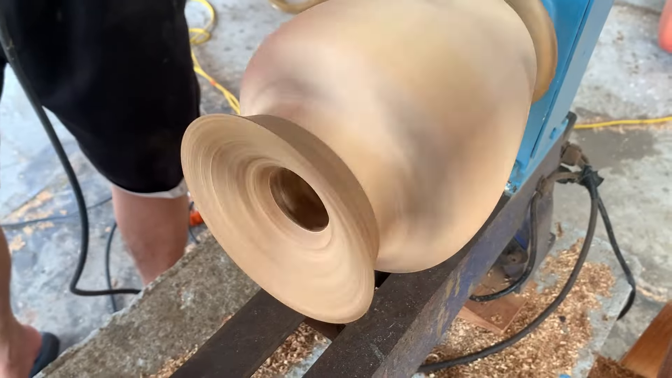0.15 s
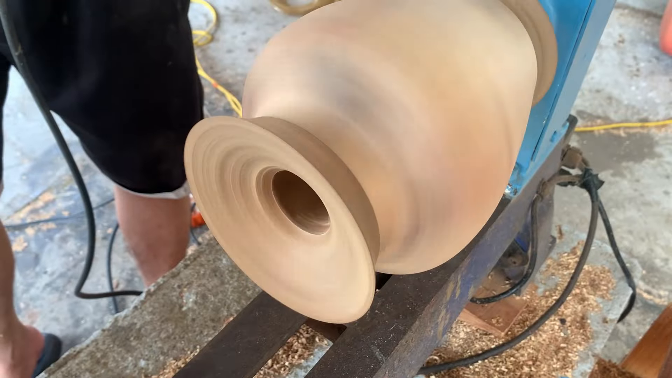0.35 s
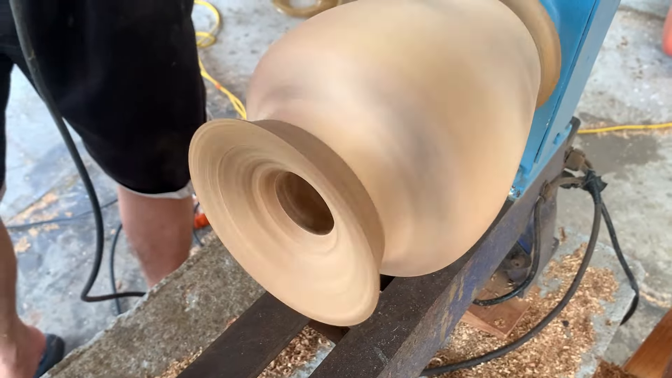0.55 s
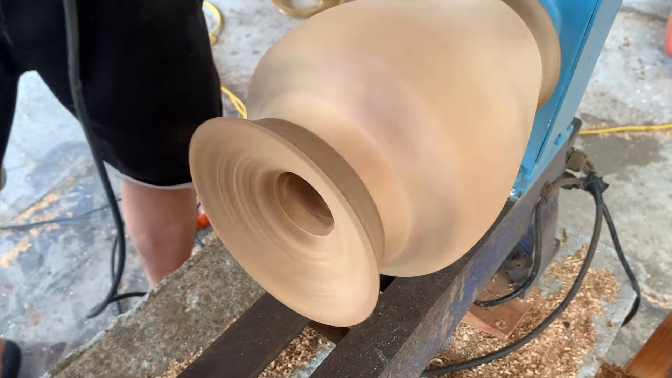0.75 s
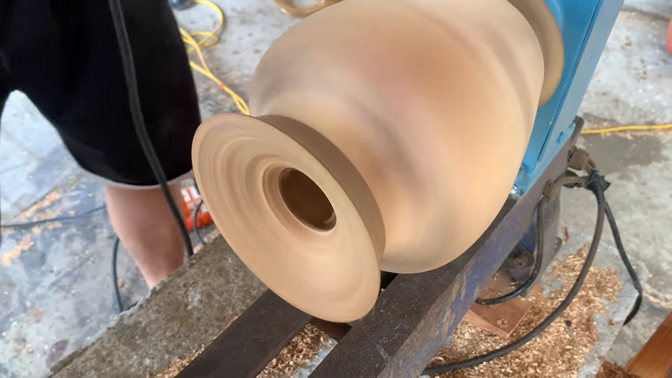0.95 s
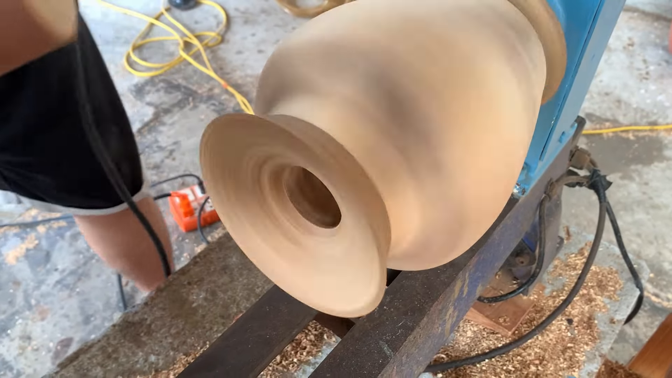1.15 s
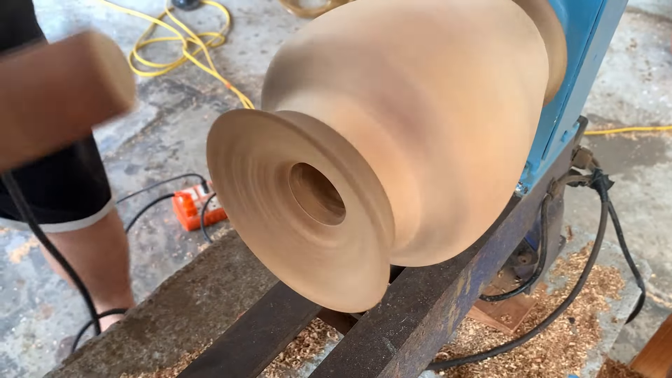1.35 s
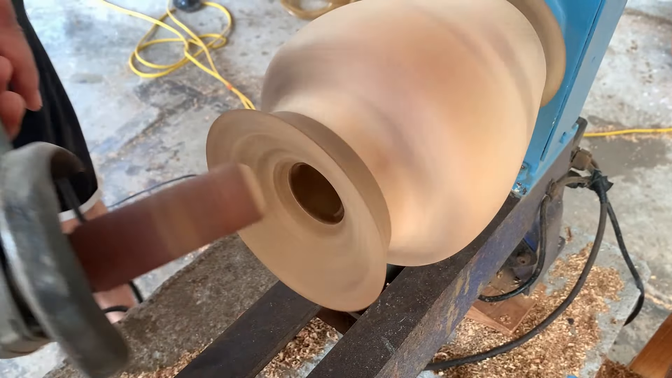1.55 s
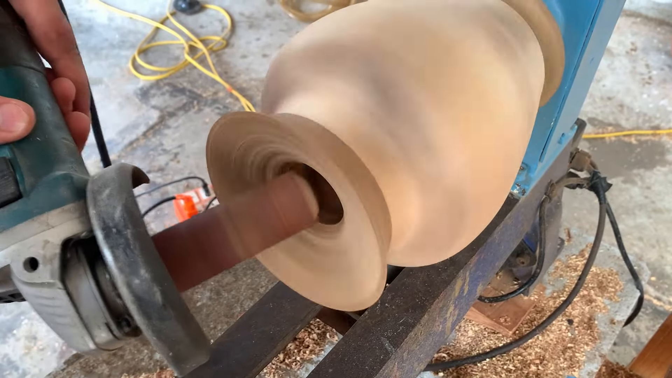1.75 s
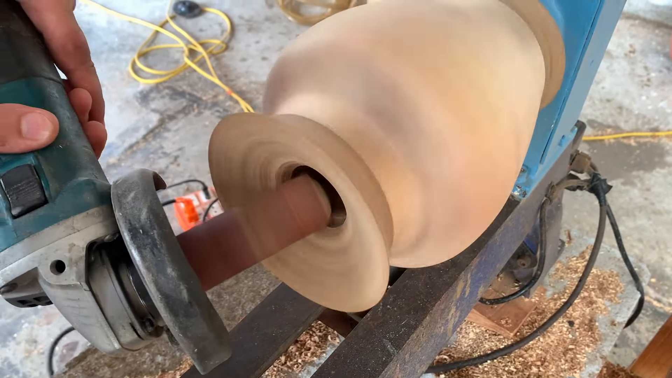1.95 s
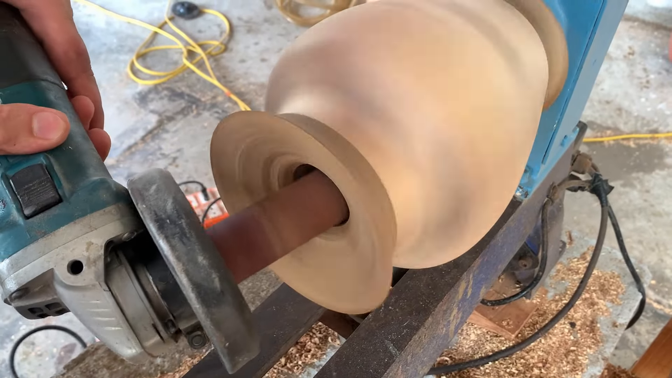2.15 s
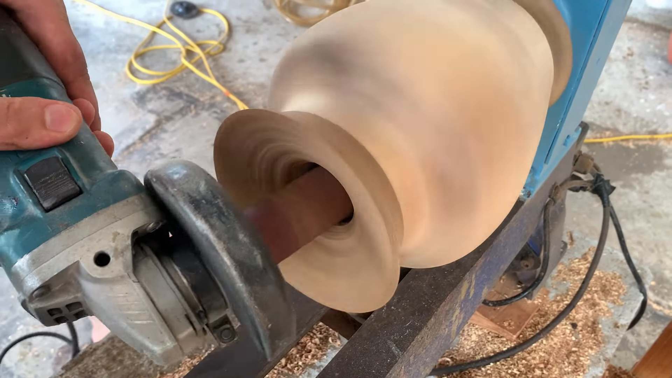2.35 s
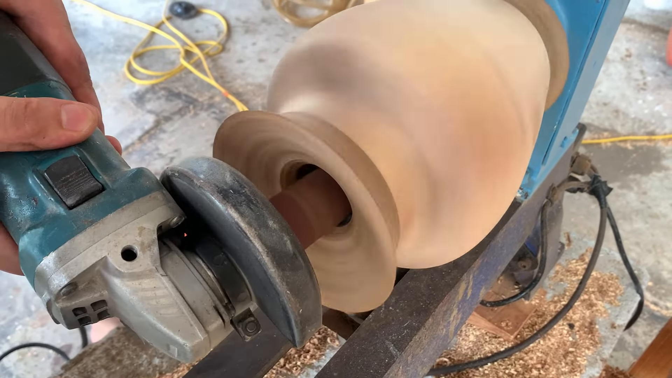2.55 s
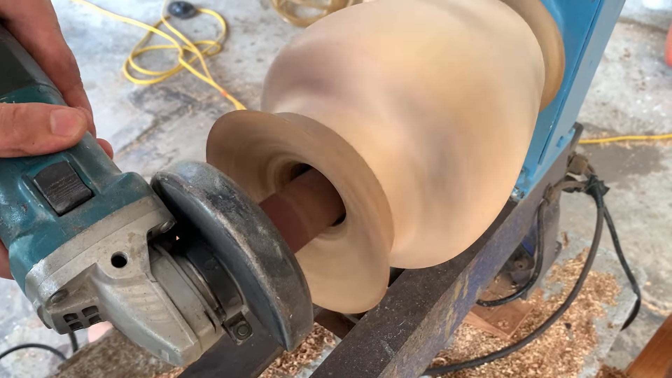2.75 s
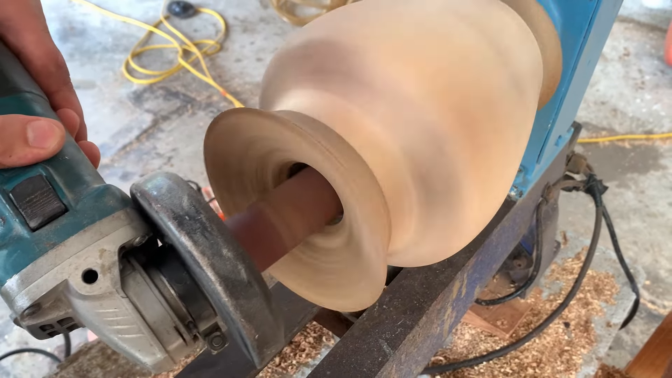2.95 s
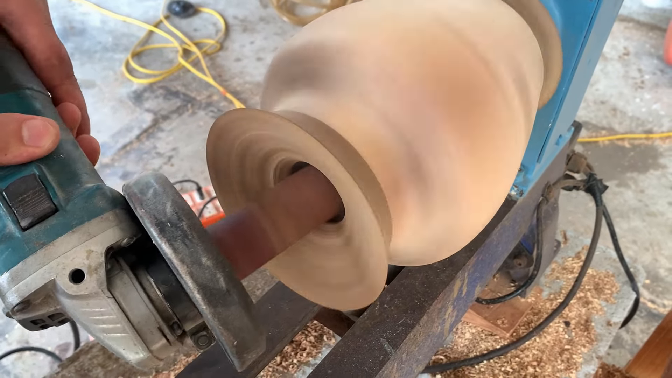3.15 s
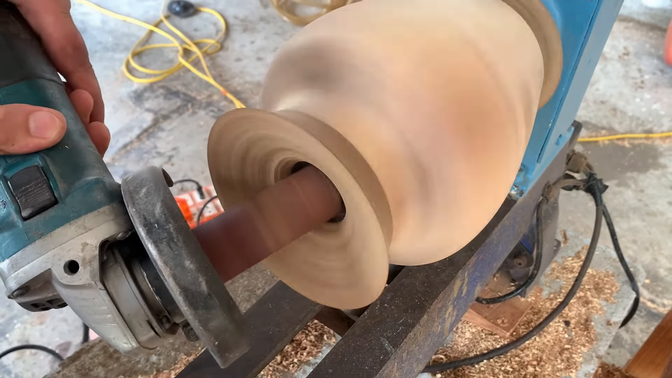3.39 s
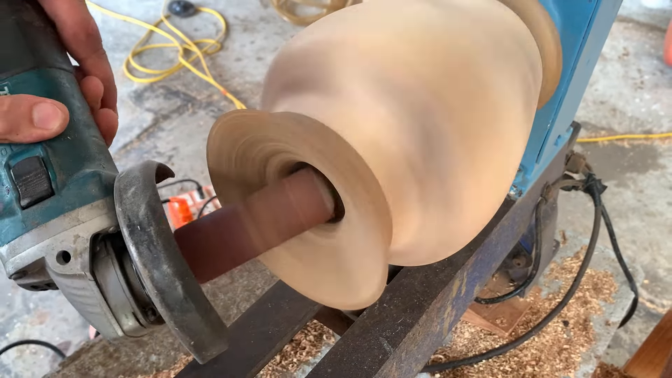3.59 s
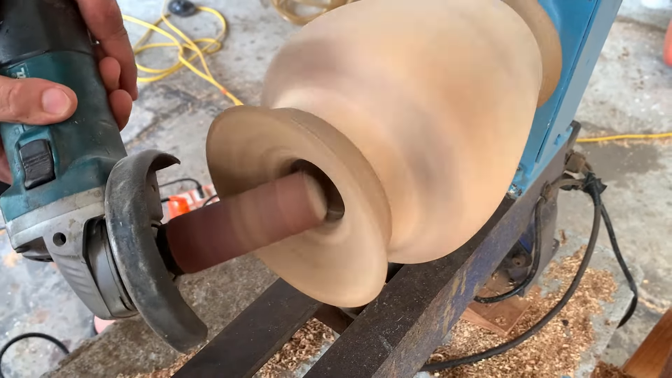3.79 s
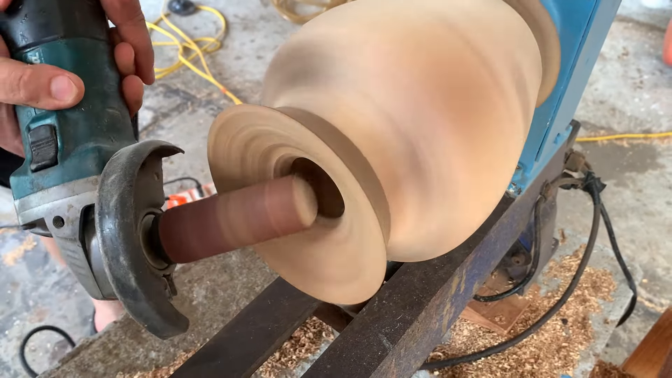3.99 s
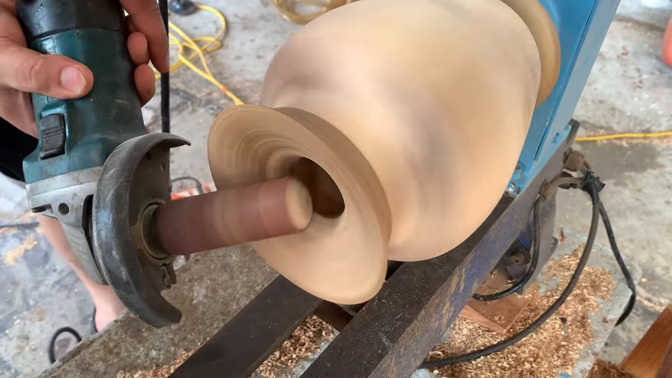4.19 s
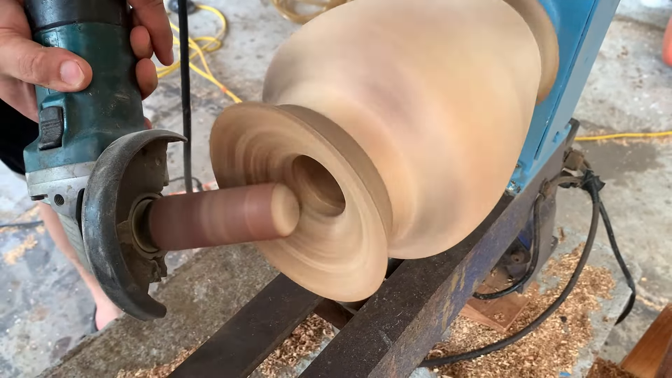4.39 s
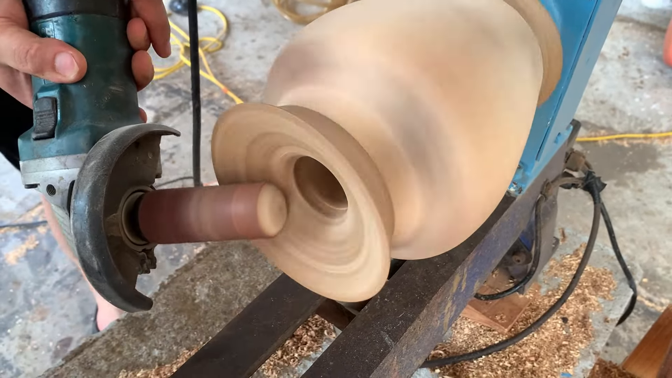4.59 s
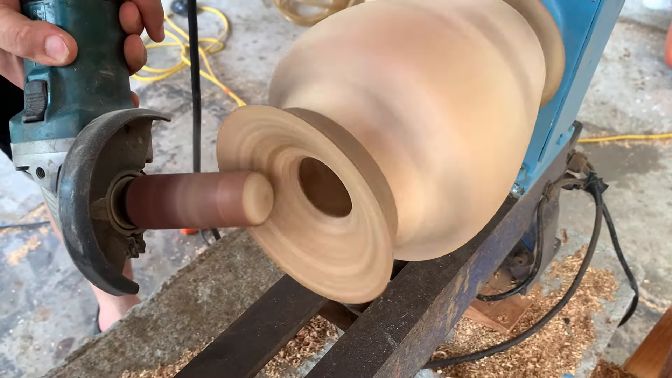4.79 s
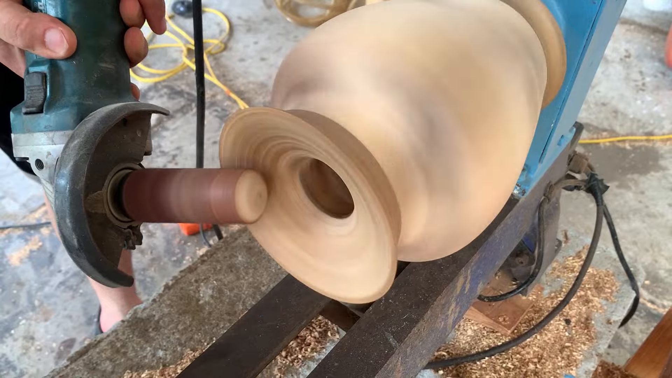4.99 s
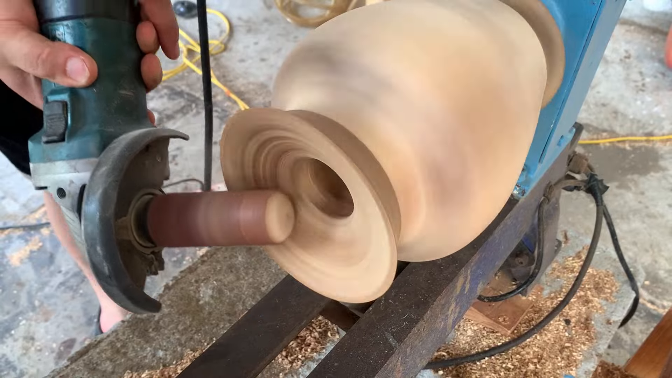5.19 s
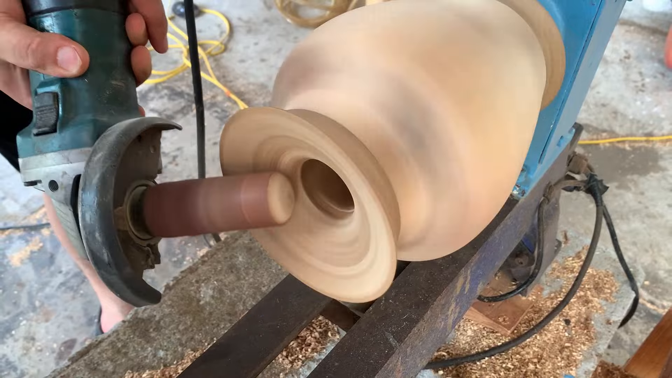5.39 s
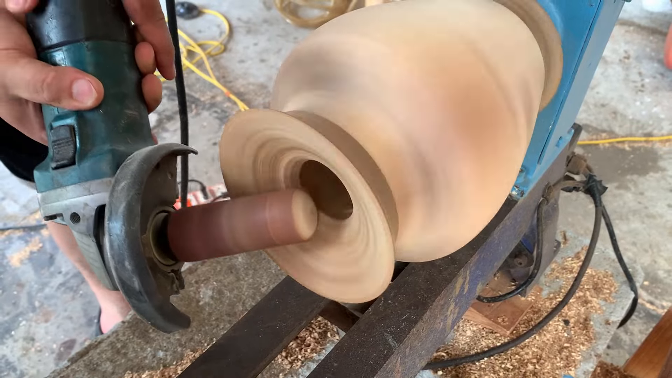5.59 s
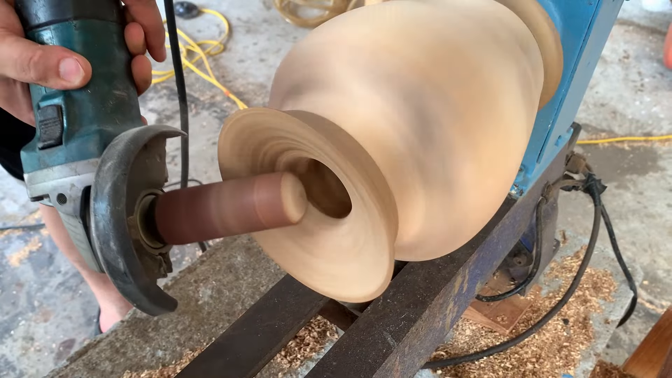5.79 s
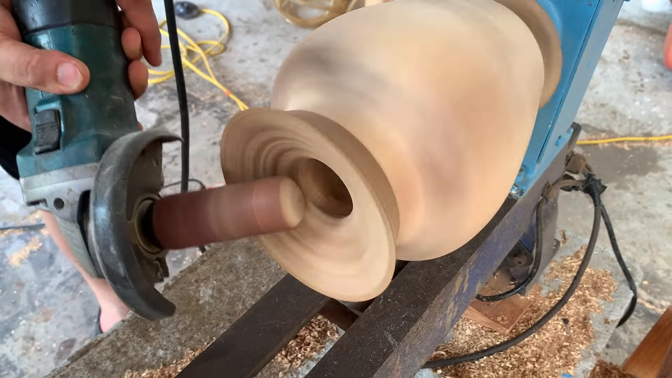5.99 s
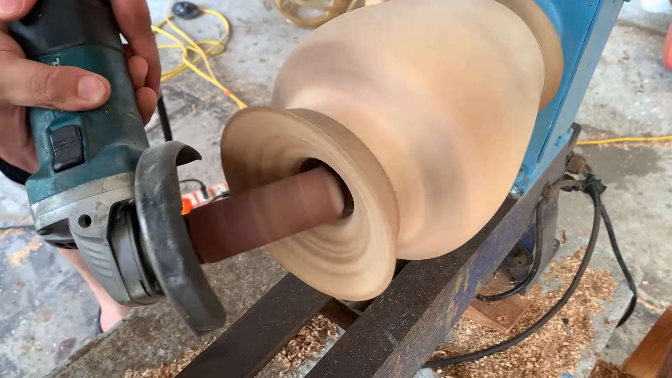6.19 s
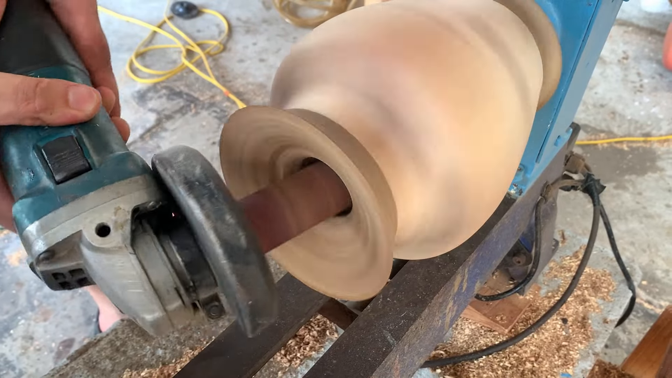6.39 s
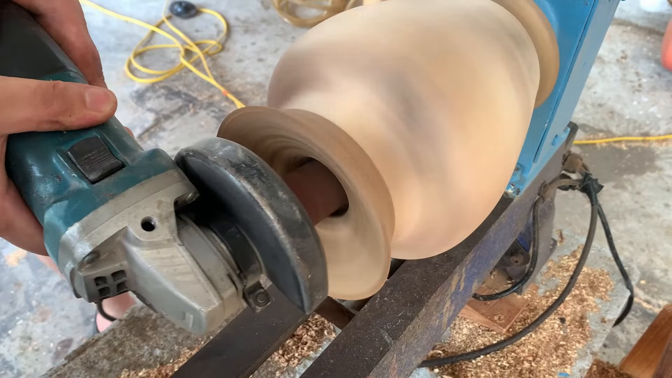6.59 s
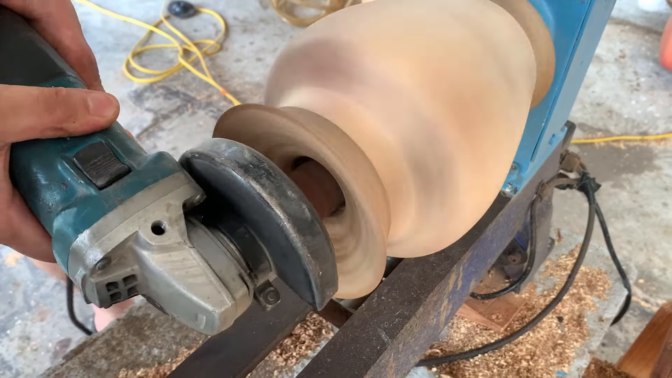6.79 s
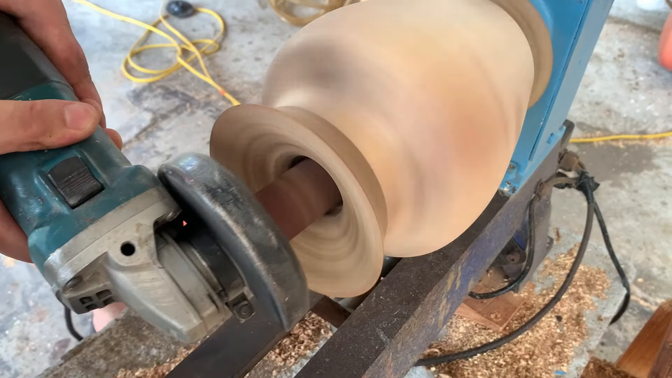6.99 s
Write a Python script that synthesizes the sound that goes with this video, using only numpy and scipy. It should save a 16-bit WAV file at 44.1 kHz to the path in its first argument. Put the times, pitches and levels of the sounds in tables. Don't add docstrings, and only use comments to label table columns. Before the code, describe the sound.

Close, dry stereo in a workshop, with a rapid choppy flutter that differs left and right. From 0 to 1.2 s a lathe spins a wooden vase: broad belt whirr, airy hiss, a hollow hum around 400 Hz swelling in by 0.3 s and swaying in pitch, and irregular bright ticks of a loose guard, densest before 0.6 s. Low puffs and thuds bump the microphones, strongly near 1.05 s. At 1.22 s a grinder's sanding drum bites with a snagging, ringing burst, then tears steadily: sharp hiss above 8 kHz, gritty rasp and dull wood body beneath, motor whine swelling near 1.6 s and fading by 2.3 s. The rasp is strong and fairly smooth from 2 to 2.8 s, then dips repeatedly, leaving thin hiss. From 4.2 to 4.9 s and 5.2 to 5.9 s, crackling rim slaps chatter. Muffled dips follow, and smoother sanding continues to 7 s, with a knock at 6.9 s.

```python
import sys
import numpy as np
from scipy import signal
from scipy.fft import rfft, irfft, next_fast_len
from scipy.io import wavfile
from scipy.ndimage import uniform_filter1d, minimum_filter1d

SR = 44100
rng = np.random.default_rng(int(sys.argv[2]) if len(sys.argv) > 2 else 0)


def output_pcm(signal):
    pcm = np.clip(np.atleast_2d(signal).T, -1, 1) * 32767
    wavfile.write(sys.argv[1], SR, np.round(pcm).astype(np.int16))


def amplitude_ratio(level_db):
    exponent = np.asarray(level_db, float) / 20
    return 10 ** exponent


N = 310464
TIME = np.arange(N) / SR
STEPS = np.arange(0, N / SR + .01, .002)
SNIPPETS_HZ, SHAFT_HZ = 85.53, 175

# frequency in Hz, density in dB per Hz.
RUMBLE_SPECTRUM = [(12, -36), (25, -4), (50, -6), (80, -1.5), (113, 0), (160, -2.5), (230, -3.5),
                   (320, -11.5), (450, -32.5)]
# frequency in Hz, density in dB per Hz.
GUST_SPECTRUM = [(140, -40), (230, -24), (400, 9), (700, 4), (1200, -39)]
# peak in seconds, peak level in dB, length in seconds.
PUFFS = [(0.31, -42, .06), (0.45, -35, 0.045), (0.636, -44.5, 0.073), (1.06, -30.5, 0.053),
         (1.103, -37, 0.046), (1.178, -41.5, 0.055), (1.235, -41, 0.046), (1.36, -41, 0.12),
         (1.544, -52, 0.19), (1.75, -49, 0.046), (1.857, -42, 0.043), (2.19, -49.5, 0.27),
         (2.433, -50, 0.11), (2.66, -59, .2), (3.305, -53, .2), (3.879, -41, 0.025), (3.958, -43.5, 0.045),
         (4.125, -44.5, 0.04), (4.36, -46, 0.12), (4.51, -44, 0.12), (4.73, -43, 0.064), (5.01, -51, 0.052),
         (5.17, -49, 0.09), (5.533, -45.5, 0.065), (5.626, -48, .05), (5.783, -46, 0.058),
         (6.504, -55, 0.041), (6.723, -55, 0.099), (6.93, -44.5, 0.079)]

# frequency in Hz, density in dB per Hz.
WHIRR_SPECTRUM = [(290, -38), (500, -12), (561, -3), (909, -2), (1440, -4.5), (2130, -5), (2440, -7.5),
                  (2900, -0.5), (4870, -9.5), (7800, -15), (10100, -38), (17200, -120)]
# frequency in Hz, density in dB per Hz.
AIR_SPECTRUM = [(7700, -40), (8000, -4.5), (9600, -4.5), (10600, -2), (11500, 0), (12200, 0), (12900, -2),
                (13800, -2), (15100, -6), (16000, -11)]
# frequency in Hz, left minus right in dB.
LATHE_LEAN = [(60, -1.0), (110, 0.0), (200, -1.0), (380, -3), (700, 1), (1290, -1), (2380, 0.5),
              (4400, -3.5), (8120, -5), (15000, 1)]
# frequency in Hz, width in Hz, level in dB.
BED_STATES = [
    [(385, 43, 17), (454, 130, 4)],
    [(424, 60, 18), (510, 92, 2.5)],
]
# time in seconds, share of the high state 0-1, hum in dB.
BED_SWAY = [(.2, .3, -3.5), (.34, 0, 1.5), (.4, 0.5, -1), (.47, 1, -0.5), (.57, 0.4, -2), (.7, 1, 0),
            (.84, 0.27, -3.5), (.9, 0.7, -3), (.97, 0.2, -0.5), (1.13, .7, 0), (1.3, 0.4, 7)]
# frequency in Hz, width in Hz, level in dB.
PULLEYS = [(2180, 360, 11), (2920, 150, -8), (3940, 700, -6)]
# frequency in Hz, width in Hz, level in dB.
BELT_COVER = [(10600, 660, -1), (12900, 500, 1)]
# time in s, half length in s, hum lost in dB, air lost in dB.
LATHE_GAPS = [
    (0.34, 0.039, 7, -5),
    (1.08, 0.042, 13, 7),
]

# frequency in Hz, width in Hz, level in dB.
GUARD_PANELS = [
    [(10400, 1700, 2), (14500, 2200, -1)],
    [(13100, 1200, 3.5), (11500, 1500, -8)],
]
# frequency in Hz, width in Hz, level in dB.
GUARD_FRAME = [(2150, 360, 7), (2930, 450, 5.5), (4120, 1200, 0)]
# frequency in Hz, width in Hz, level in dB.
TICK_EDGE = [(8000, 6700, -2.5)]
# time in seconds, sheet in dB, frame in dB.
TICKS_LEFT = [(.031, -31, -17.5), (.0931, -27, -23), (.1391, -26, -19), (.1523, -27, -22),
              (.3059, -25, -19.5), (.3275, -27, -29), (.3385, -28, -20), (.3944, -28, -22),
              (.4414, -27, -22), (.5011, -25, -33), (.5141, -24, -32), (.5267, -24, -27), (.538, -22, -35),
              (.5523, -25, -22), (.5788, -25, -24), (.7381, -23.5, -25), (.8584, -23, -32),
              (.8723, -29, -34), (1.0436, -36, -19), (1.0607, -42, -20), (1.108, -35, -19),
              (1.1385, -26, -23), (1.1745, -37.5, -29), (1.2075, -38, -26)]
# time in seconds, sheet in dB, frame in dB.
TICKS_RIGHT = [(0.048, -27, -21), (.114, -28, -30), (0.1628, -32, -22), (0.32, -22, -20),
               (0.3283, -29, -21), (.3397, -25, -27), (0.35, -25, -22), (0.408, -29, -23),
               (.4303, -27, -17.5), (.4403, -30, -30), (0.541, -26, -25), (.5764, -24, -24),
               (0.589, -33, -25), (0.6585, -22, -34), (.7984, -20.5, -37), (.8938, -25, -33),
               (.9065, -31, -17.5), (1.009, -28, -18.5), (1.0246, -22, -26), (1.1353, -20, -17.5)]

# start in seconds, level in dB, first pitch in Hz, last pitch in Hz.
KNOCKS = [(.423, -24.5, 140, 90), (.446, -38, 130, 90), (1.018, -20.5, 402, 200), (1.04, -21, 302, 171),
          (1.061, -21, 160, 85), (1.082, -21, 250, 100), (1.161, -23, 180, 80), (1.189, -31, 200, 110),
          (1.842, -27, 172, 96), (2.464, -34, 150, 94), (3.722, -36, 416, 370), (3.872, -27, 262, 110),
          (3.889, -38, 180, 110), (3.949, -32, 199, 118), (4.271, -44, 220, 110), (4.358, -39, 220, 110),
          (4.434, -40, 230, 110), (4.478, -34, 760, 623), (4.485, -46, 305, 152), (4.515, -32, 500, 268),
          (4.523, -38, 1000, 904), (4.531, -42, 300, 200), (4.57, -34, 251, 121), (5.536, -41, 350, 130),
          (5.54, -38, 560, 330), (5.615, -41, 250, 110), (5.784, -37, 200, 110), (6.916, -26.5, 450, 148.5),
          (6.936, -34, 775, 570)]

# time in seconds, pitch in Hz, level in dB.
WHINE = [
    (1.22, 1003, -72),
    (1.6, 1040, -41),
    (2.0, 1130, -55),
    (2.3, 1123, -70),
    (4.1, 1025, -55),
    (4.3, 1025, -50.5),
    (6.0, 1015, -50.5),
    (6.4, 1028, -56),
    (7.04, 1165, -56),
]
# time in seconds, ring in dB.
HOUSING_LEVEL = [(1.23, -42), (1.45, -39), (1.6, -43), (1.8, -34.5), (2.05, -37), (2.28, -37), (2.4, -45),
                 (2.6, -41), (3.5, -40), (3.8, -61), (5.25, -50), (5.36, -38), (5.46, -48), (7.04, -48)]
# frequency in Hz, width in Hz, level in dB.
HOUSING_SHELL = [(11800, 500, 0)]

# time in seconds, pressure as hiss level in dB.
PRESSURE = [(1.23, -35), (1.28, -33), (1.35, -32), (1.42, -29), (1.87, -29.5), (1.92, -29.5), (2.34, -27.5),
            (2.5, -30.5), (3.26, -31.5), (4.12, -35), (4.46, -31.5), (5.06, -36), (5.37, -32),
            (5.61, -34.5), (5.83, -33), (6.15, -36), (6.47, -32), (7.04, -31.5)]
# time in seconds, share inside the mouth 0-1, bite on the rim 0-1.
DRUM_POSE = [(1.22, 0.76, 0.17), (1.65, 0.54, 0.14), (1.76, 0.48, 0.17), (2.2, 0.5, 0.1), (2.7, 0.57, 0),
             (2.95, 0.4, 0), (3.15, 0.6, 0.15), (3.5, 0.53, 0.02), (4.2, 0.54, 0), (4.38, 0.28, 0.38),
             (4.9, 0.5, 0.14), (5.24, 0.53, 0.15), (5.36, 0.25, 0.5), (5.6, 0.56, 0.16), (5.85, 0.38, 0.2),
             (5.97, 0.5, 0), (6.4, 0.38, 0.14), (6.7, 0.5, 0), (7.04, 0.62, 0.1)]
# frequency in Hz, density in dB per Hz.
HISS_SPECTRUM = [(7800, -32.5), (7950, -1.5), (8150, 1), (8600, -1), (10400, 0), (12000, -1.5), (13000, -2),
                 (14000, -5.5), (15700, -6), (16500, -60)]
# frequency in Hz, left minus right in dB.
HISS_LEAN = [(8150, -7), (9000, -1.5), (10500, 0.5), (15000, -0.5)]
# frequency in Hz, density in dB per Hz.
MOUTH_SPECTRUM = [(1000, -50), (1700, -21), (1820, -25), (2260, -4.5), (2840, 5.5), (3110, 3), (3490, 2.5),
                  (3800, 4.5), (4150, 2.5), (5840, -11), (7900, -2), (10300, -55), (17400, -120)]
# frequency in Hz, density in dB per Hz.
RIM_SPECTRUM = [(1000, -52), (1700, -48), (2180, -15.5), (3030, -1.5), (3450, -9.5), (4070, 2), (4750, 7.5),
                (5170, 9.5), (6860, 7.5), (7600, 6), (7900, -20), (10300, -54), (17400, -120)]
# frequency in Hz, density in dB per Hz.
WOOD_SPECTRUM = [(140, -8.5), (240, -5.5), (364, 0.5), (433, -1), (682, -1), (781, -2), (1160, 2),
                 (1270, 1.5), (1820, -1), (2100, -2), (2730, -8), (4620, -120)]
# frequency in Hz, left minus right in dB.
MOUTH_LEAN = [(2000, -1.5), (2900, 6.5), (4000, 1), (5200, -11), (5700, -4), (6500, -9), (6900, -21.5),
              (7900, 14.5)]
# frequency in Hz, left minus right in dB.
RIM_LEAN = [(2000, -4), (3000, -9), (4500, 4), (6000, -2), (7500, 6)]
# frequency in Hz, width in Hz, level in dB.
TOUCH_MODES = [(2270, 680, 4), (2690, 200, 13), (3880, 900, 6)]
# frequency in Hz, width in Hz, level in dB.
GEAR_MODES = [(4050, 28, 4.5), (2780, 84, 0), (3500, 450, 0)]
# frequency in Hz, width in Hz, level in dB.
RIM_MODES = [(4560, 1600, 0)]
# time in seconds, half length in seconds, level over the rasp in dB.
RIM_SINGS = [(3.541, 0.058, -13), (3.865, .05, -15), (4.49, 0.055, -11), (4.555, 0.03, -11),
             (4.632, 0.031, -12), (5.297, .06, -14), (5.673, 0.11, -18), (5.81, 0.03, -20),
             (6.904, 0.049, -22)]
# time in seconds, rasp gain in dB, hiss gain in dB.
SNAGS_LEFT = [(1.2232, 2, 14), (1.2342, 0, -2), (1.243, 3, 0), (1.2495, 5, 0), (1.2549, 4, -2),
              (1.261, 6, 0), (1.2683, 7, 3), (1.2763, 6, 5), (1.2855, 5, 5), (1.2979, 1, 8), (1.3247, 6, 3),
              (1.3309, 4, 0), (1.338, 6, 0)]
# time in seconds, rasp gain in dB, hiss gain in dB.
SNAGS_RIGHT = [(1.225, 4, 10), (1.2364, 4.4, 4), (1.2509, 5.5, 1), (1.2689, 5, 9.7), (1.2838, 3, 10),
               (1.2985, 2.9, 7.7), (1.3244, 5.4, 4), (1.334, 3.7, 5)]
# time in seconds, rasp gain in dB, hiss gain in dB.
SLAPS_LEFT = [(4.2232, 9, 2), (4.2475, 5, 7), (4.394, -2, 0), (4.4264, 3.0, 5), (4.437, 11, 4),
              (4.4495, 4, 9), (4.4783, 12, -1), (4.491, 5, 5), (4.5529, 4.0, 6.0), (4.5716, 1, 9),
              (4.6357, 5.0, 11), (4.6701, 4.0, 9.0), (4.7392, 5, 9), (4.826, 8, 7.0), (4.8734, -3, 5),
              (5.2391, 6.0, 6), (5.258, 4, 7.0), (5.2705, 1, 5), (5.2808, 0, 6), (5.2859, 0, 4),
              (5.3208, 1, 7), (5.3449, -2, 6.0), (5.3572, 0, 5), (5.364, 5, 2), (5.3686, -1, 11),
              (5.3805, 1, 5), (5.3866, -4, 2), (5.3959, 0, 4), (5.4087, -3, 6), (5.4144, 0, 6),
              (5.4205, 1, 7), (5.4322, 5, 8), (5.4459, 0, 5), (5.4867, 0, 8), (5.5065, 1.0, 8),
              (5.5152, 1, 9), (5.6137, 6, 7.0), (5.6626, 7, 3), (5.7075, 8, 6.0), (5.7158, 7, 6.0),
              (5.7452, 7, 7.5), (5.7881, 1, 9), (5.8023, 6.0, 5.0), (5.825, 6.0, 8), (5.8492, 1, 5),
              (5.8554, 3.0, 6.0)]
# time in seconds, rasp gain in dB, hiss gain in dB.
SLAPS_RIGHT = [(4.2227, 3.0, 7.1), (4.2493, 2.0, 6.4), (4.313, 7.3, 3.4), (4.362, 1.0, 6.4),
               (4.3776, 0, 6.0), (4.4362, 4.0, 6.0), (4.4831, 5.0, 5), (4.619, 6.9, 5.0), (4.6719, -3, 5.4),
               (4.746, 2, 7.0), (4.898, 1, 4.6), (5.2391, 2.0, 7.0), (5.2453, 2.0, 6.0), (5.2511, 6, 5.6),
               (5.2571, 4, 6.0), (5.2696, 5.0, 7.0), (5.3066, 0, 5), (5.3212, -1, 6.4), (5.3271, -2, 4),
               (5.3381, -2, 4), (5.3519, 3, 6.0), (5.3628, 2.0, 5), (5.3695, 3, 5.5), (5.3752, 0, 5.2),
               (5.3812, -3, 5.5), (5.4024, 0, 7.1), (5.4128, 1, 6), (5.4238, 1.0, 5.5), (5.4423, 3, 3),
               (5.4564, 0, 4), (5.4857, 2, 4), (5.7976, 7.0, 4.0), (5.846, 1.0, 6.0), (5.8592, 4.0, 7.0),
               (6.7384, -1, 6.5)]

# start in s, length in s, depth in dB.
DUCKS = [(1.543, 0.064, -3), (1.607, 0.033, 2.5), (1.669, 0.052, 6.5), (1.752, 0.13, -2), (1.897, 0.077, 4),
         (1.999, 0.075, 12.5), (2.814, 0.12, 11), (2.94, 0.16, 6), (3.355, 0.051, 13), (3.41, 0.1, 2),
         (3.564, 0.053, 4.5), (4.071, 0.086, 4.5), (4.22, 0.069, 4.5), (4.327, 0.16, 5.5), (4.47, .06, 0.5),
         (4.528, 0.087, 1.5), (4.657, 0.087, 4), (4.811, 0.2, 4), (5.183, 0.11, 2.5), (5.378, 0.14, 9),
         (5.507, 0.3, 1.5), (5.84, 0.13, 5.5), (5.99, 0.091, 3.5), (6.098, 0.11, 5.5), (6.202, 0.082, 4.5),
         (6.297, .14, 11.5), (6.429, 0.18, 9.5), (6.601, 0.074, 7), (6.973, 0.043, 4)]
# frequency in Hz, rarity lost.
PRONE_BANDS = [(3300, 0), (3750, .8), (4100, 0), (7300, 0), (7750, .75)]


def unit(x):
    return x / np.sqrt(np.mean(x ** 2) + 1e-20)


def along(points, hz):
    f, v = np.transpose(points)
    return np.interp(np.log(hz + 1), np.log(f + 1), v)


def curves(rows):
    s, *columns = np.transpose(rows)
    return [np.interp(TIME, s, column) for column in columns]


def bump(t, s, half):
    return np.exp(-((t - s) / half) ** 2)


def wobble(rate):
    knots = rng.standard_normal((2, 1000))
    return np.array([np.interp(TIME * rate, np.arange(1000), k) for k in knots])


def filtered(x, response):
    m = next_fast_len(N + 8192)
    return irfft(rfft(x, m) * response(np.fft.rfftfreq(m, 1 / SR)), m)[..., :N]


def resonant(modes):
    def response(f):
        total = 0
        for k, (centre, width, db) in enumerate(modes):
            band = 1j * f * width
            total = total + (-1) ** k * amplitude_ratio(db) * band / (centre * centre - f * f + band + 1)
        return total
    return response


def resonant_twice(modes):
    return lambda hz: resonant(modes)(hz) ** 2


def coloured(x, spectrum, lean):
    sides = np.array([[.5], [-.5]])
    return unit(filtered(x, lambda hz: amplitude_ratio(along(spectrum, hz) + along(lean, hz) * sides)))


def grit(patchy_db, rough_db):
    z = signal.stft(rng.standard_normal((2, N)), nperseg=512)[2]
    field = uniform_filter1d(rng.standard_normal(z.shape), size=5, axis=1)
    field = uniform_filter1d(field, size=14, axis=2)
    pair = signal.istft(z * amplitude_ratio(patchy_db * unit(field)), nperseg=512)[1][:, :N]
    grains = uniform_filter1d(rng.standard_normal((2, N)), size=24, axis=1)
    return unit(pair * amplitude_ratio(rough_db * unit(grains)))


def splices(depth_db, swell_db):
    turn = np.cumsum(SNIPPETS_HZ * (1 + 0.1193 * wobble(30)), axis=1) / SR
    return unit(amplitude_ratio(depth_db * np.cos(2 * np.pi * turn) + swell_db * wobble(SNIPPETS_HZ)))


def ducking(t):
    total_db = 0
    for s, length, db in DUCKS:
        edges = np.minimum((STEPS - s) / 0.057, (s + length - STEPS) / 0.049)  # closing, opening time in s
        total_db = total_db + db * np.clip(edges + .5, 0, 1)
    return np.interp(t, STEPS, total_db)


def draught():
    calm_db, lathe_shake_db = -58, -47.5
    fall_db = 11
    power = sum(amplitude_ratio(db - fall_db * abs(STEPS - s) / length) ** 2 for s, db, length in PUFFS)
    power = power + amplitude_ratio(calm_db) ** 2 + amplitude_ratio(lathe_shake_db) ** 2 * (STEPS < 1.225)
    rumble_db = np.interp(TIME, STEPS, 10 * np.log10(power))
    surge_db = rumble_db - uniform_filter1d(rumble_db, size=SR // 2)
    air = rng.standard_normal((2, N)) * amplitude_ratio(4.4 * wobble(30))
    low = coloured(air, RUMBLE_SPECTRUM, [(100, .1)])
    edge = coloured(air, GUST_SPECTRUM, [(100, .1)])
    return amplitude_ratio(rumble_db + 3.5) * (low + amplitude_ratio(0.5 * surge_db - 12.5) * edge)


def bed_hum():
    spin_up_s, rise_db_per_s = 0.28, 80
    high, sway_db = curves(BED_SWAY)
    high = np.clip(high, 0, 1)
    shake = rng.standard_normal((2, N))
    low_ring, high_ring = (unit(filtered(shake, resonant(state))) for state in BED_STATES)
    hum_db = -34.5 - rise_db_per_s * np.clip(spin_up_s - TIME, 0, None) + sway_db + 0.73 * wobble(24.7)
    return amplitude_ratio(hum_db) * (np.sqrt(1 - high) * low_ring + np.sqrt(high) * high_ring)


def lathe():
    hum_lost_db, air_lost_db = sum(np.outer(lost, np.clip(1 - abs(TIME - s) / half, 0, 1))
                                   for s, half, *lost in LATHE_GAPS)
    belt = grit(patchy_db=2.5, rough_db=1.5) * splices(depth_db=0.0, swell_db=1.6)
    whirr = amplitude_ratio(-34.5 + 0.5 * TIME) * coloured(belt, WHIRR_SPECTRUM, LATHE_LEAN)
    whirr += amplitude_ratio(-44.5) * unit(filtered(belt, resonant(PULLEYS)))
    air = amplitude_ratio(-41 - air_lost_db) * coloured(belt, AIR_SPECTRUM, LATHE_LEAN)
    air += amplitude_ratio(-51 - air_lost_db) * unit(filtered(belt, resonant_twice(BELT_COVER)))
    belt_fade = np.clip((1.225 - TIME) / 0.0038, 0, 1)
    hum_fade = np.clip((1.306 - TIME) / 0.27, 0, 1)
    return (whirr + air) * belt_fade + bed_hum() * amplitude_ratio(-hum_lost_db) * hum_fade


def guard():
    chatter_db, spread_db, chatter_until_s = -34.5, 2.5, 0.8
    sheet_hits, frame_hits = np.zeros((2, 2, N)), np.zeros((2, N))
    t = np.arange(400) / SR
    shape = amplitude_ratio(-60 * t / 0.013) * (1 - np.exp(-t / 0.00037))
    for side, ticks in enumerate((TICKS_LEFT, TICKS_RIGHT)):
        chatter = rng.normal(chatter_db, spread_db, size=(24, 3))
        chatter[:, 0] = rng.random(24) * chatter_until_s
        for s, sheet_db, frame_db in ticks + chatter.tolist():
            burst = shape * rng.standard_normal(len(t))
            turn = rng.random() * np.pi / 2
            panels = np.outer([np.cos(turn), np.sin(turn)], burst)
            start = round(s * SR)
            sheet_hits[:, side, start:][:, :len(t)] += amplitude_ratio(sheet_db) * panels
            frame_hits[side, start:][:len(t)] += amplitude_ratio(frame_db) * burst
    sheet = sum(filtered(hits, resonant_twice(panel)) for hits, panel in zip(sheet_hits, GUARD_PANELS))
    edge = filtered(sheet_hits.sum(axis=0), resonant(TICK_EDGE))
    frame = filtered(frame_hits, resonant(GUARD_FRAME))
    return amplitude_ratio(8.5) * sheet + edge + amplitude_ratio(8.0) * frame


def knocks():
    rise_s, decay_s, glide_s = 0.0051, 0.0094, 0.0049
    detune, skew_s = .1, .0002
    out, t = np.zeros((2, N + SR)), np.arange(4000) / SR
    shape = (1 - np.exp(-t / rise_s)) * np.exp(-t / decay_s)
    for s, db, first_hz, last_hz in KNOCKS:
        hz = last_hz + (first_hz - last_hz) * np.exp(-t / glide_s)
        cycles = np.cumsum(hz) / SR * (1 + detune * np.array([[1], [-1]]))
        cycles = cycles - rng.permutation(2)[:, None] / 4
        for side, late in enumerate(rng.random(2) * skew_s):
            thump = amplitude_ratio(db + 7.0) * shape * np.sin(2 * np.pi * cycles[side])
            out[side, round((s + late) * SR):][:len(t)] += thump
    return out[:, :N]


def motor():
    hz, whine_db = curves(WHINE)
    ring_db, = curves(HOUSING_LEVEL)
    phase = 2 * np.pi * np.cumsum(hz * (1 + .05 * wobble(SNIPPETS_HZ)), axis=1) / SR
    whine = amplitude_ratio(whine_db - 0.85 * ducking(TIME) + 5.7 * wobble(40)) * np.sin(phase)
    ring = amplitude_ratio(ring_db + 4.5) * unit(filtered(rng.standard_normal((2, N)), resonant(HOUSING_SHELL)))
    return (whine + ring) * (TIME > 1.224)


def bites():
    turn = np.cumsum(SHAFT_HZ * (1 + 0.06 * wobble(SNIPPETS_HZ)), axis=1) / SR
    size = amplitude_ratio(1.8 * rng.standard_normal((2, 1500)).clip(-3, 1.8))
    decay = amplitude_ratio(-60 * (turn % 1) / SHAFT_HZ / 0.01)
    return np.take_along_axis(size, turn.astype(int), axis=1) * decay


def slaps():
    clicks = np.zeros((2, N))
    for side, rows in enumerate((SLAPS_LEFT, SLAPS_RIGHT)):
        for k, (s, _, hiss_db) in enumerate(rows):
            clicks[side, round(s * SR)] = (-1) ** k * 3.2 * amplitude_ratio(hiss_db)
    return clicks


def snags():
    snag_s, slap_s = 0.0014, 0.0005
    gain, t = np.ones((2, 2, N)), np.arange(-200, 200) / SR
    for side, rows in enumerate((SNAGS_LEFT + SLAPS_LEFT, SNAGS_RIGHT + SLAPS_RIGHT)):
        for s, *db in rows:
            jolt = bump(t, 0, snag_s if s < 1.66 else slap_s)
            gain[:, side, round((s + t[0]) * SR):][:, :len(t)] += np.outer(amplitude_ratio(db) - 1, jolt)
    return gain


def drum_hiss(tear, pressure_db, bite):
    hiss = coloured(tear + slaps(), HISS_SPECTRUM, HISS_LEAN)
    sizzle = filtered(hiss, lambda hz: 1 / (1 + np.exp((12500 - hz) / 150)))
    sizzle_db = 1 + 5 * bump(TIME, 1.39, 0.13)
    lean_db = -2 * np.clip((1.87 - TIME) / .05, 0, 1) * np.array([[.5], [-.5]])
    return amplitude_ratio(pressure_db + bite + lean_db + 4.0) * (hiss + (amplitude_ratio(sizzle_db) - 1) * sizzle)


def vase_ring(tear):
    contact = 0.78 * np.exp(-np.clip(TIME - 1.334, 0, None) / 0.015)
    contact += 0.77 * bump(TIME, 1.255, 0.012)
    sing = sum(amplitude_ratio(db) * bump(STEPS, s, half) for s, half, db in RIM_SINGS)
    ring = contact * unit(filtered(tear, resonant(TOUCH_MODES)))
    return ring + np.interp(TIME, STEPS, sing) * unit(filtered(tear, resonant_twice(RIM_MODES)))


def drum_rasp(tear, pressure_db, inside):
    duck_db = ducking(TIME)
    fresh_db = 4.5 * np.exp(-np.clip(TIME - 1.23, 0, None) / 0.22)
    rasp_db = pressure_db + 5 + fresh_db - duck_db
    wood_early_db = 5.5 * np.clip((1.56 - TIME) / 0.26 + .5, 0, 1)
    wood_db = -14 - fresh_db + wood_early_db + (1 - 0.61) * duck_db
    rasp = inside * coloured(tear, MOUTH_SPECTRUM, MOUTH_LEAN)
    rasp += (1 - inside) * coloured(tear, RIM_SPECTRUM, RIM_LEAN)
    gears = 0.11 * unit(filtered(tear, resonant(GEAR_MODES)))
    wood = amplitude_ratio(wood_db) * coloured(tear, WOOD_SPECTRUM, [(300, -0.52), (2000, -0.087)])
    return amplitude_ratio(rasp_db + 0.19 * wobble(20)) * (rasp + vase_ring(tear) + gears + wood)


def grinder():
    pressure_db, = curves(PRESSURE)
    inside, bite = curves(DRUM_POSE)
    tear = grit(patchy_db=1.0, rough_db=0.85) * splices(depth_db=1.28, swell_db=1.12)
    tear *= (1 + 3.4 * bite * bites()) / np.sqrt(1 + 6.1 * bite ** 2)
    hiss = drum_hiss(tear, pressure_db, bite)
    rasp = drum_rasp(tear, pressure_db, np.clip(inside, 0, 1))
    rasp_jolt, hiss_jolt = snags()
    faint_db = -5 * np.clip((np.array([[1.232], [1.236]]) - TIME) / 0.0027, 0, 1)
    start = amplitude_ratio(faint_db) * np.clip((TIME - 1.2215) / 0.00087, 0, 1)
    return (hiss_jolt * hiss + rasp_jolt * rasp) * start


def scene():
    return draught() + lathe() + guard() + knocks() + motor() + grinder()


def dropouts(x, rarity, low_hz, high_hz):
    hz, t, z = signal.stft(x, SR, nperseg=1024)
    field = uniform_filter1d(rng.standard_normal(z.shape[1:]), size=3, axis=0)
    field = unit(uniform_filter1d(field, size=4, axis=1))
    limit = rarity + .9 * (t < 1.66) - along(PRONE_BANDS, hz)[:, None] - .035 * ducking(t)
    keep = (field < limit) | (hz[:, None] < low_hz) | (hz[:, None] > high_hz)
    keep = minimum_filter1d(minimum_filter1d(keep, size=3, axis=0), size=3, axis=1)
    return signal.istft(z * keep, SR, nperseg=1024)[1][:, :N]


def low_pass(x):
    return signal.sosfilt(signal.butter(12, 17090, fs=SR, output="sos"), x)


def record(dry):
    thinned = dropouts(dry, rarity=2.5, low_hz=2000, high_hz=7950)
    mix = filtered(thinned, lambda hz: hz < 15880)
    return low_pass(mix)


dry = scene()
out = record(dry)
output_pcm(out)
```